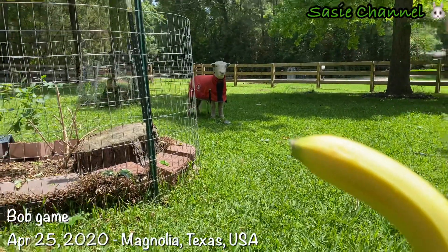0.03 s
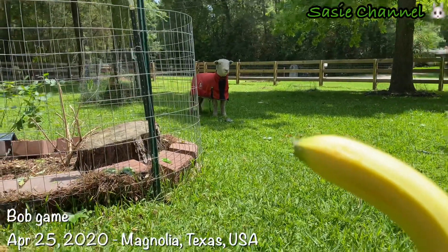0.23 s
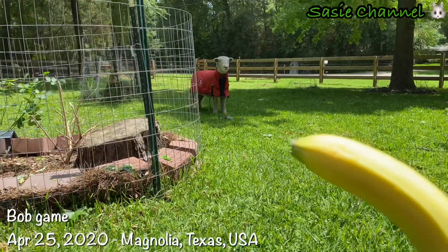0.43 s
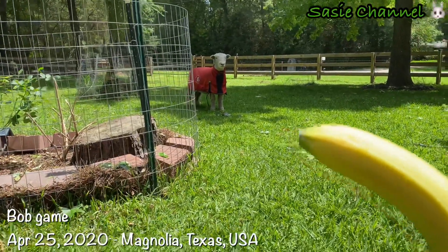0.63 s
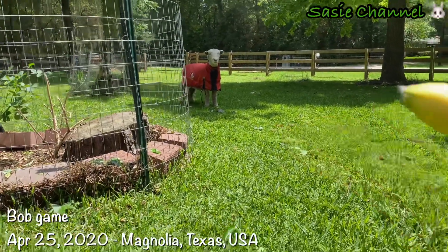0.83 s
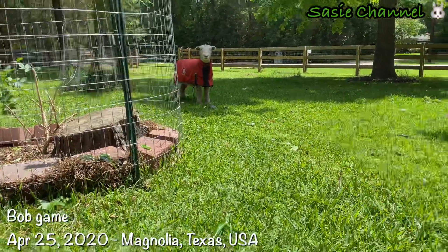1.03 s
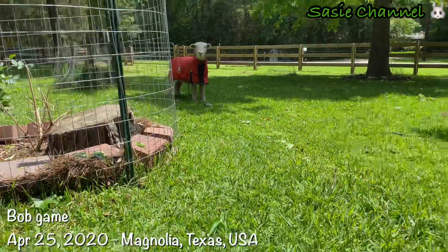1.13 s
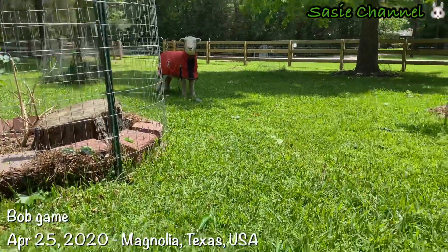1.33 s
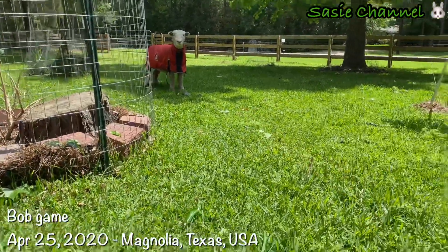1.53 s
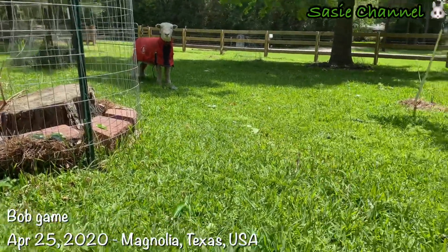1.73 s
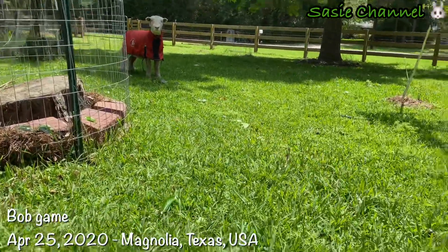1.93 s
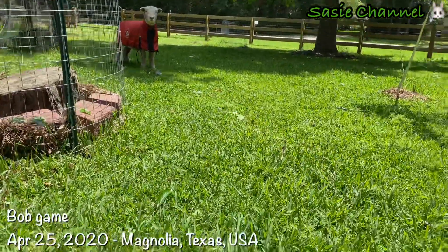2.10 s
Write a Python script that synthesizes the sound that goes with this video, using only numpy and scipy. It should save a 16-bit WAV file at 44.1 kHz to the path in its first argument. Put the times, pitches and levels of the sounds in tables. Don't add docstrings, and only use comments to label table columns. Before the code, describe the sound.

A sheep gives one low, rough, closed-mouth rumbling bleat that falls away, in a grassy yard

```python
import sys
import numpy as np
from scipy import signal
from scipy.fft import rfft, irfft, next_fast_len
from scipy.io import wavfile
from scipy.ndimage import uniform_filter1d, map_coordinates

SR = 44100
rng = np.random.default_rng(int(sys.argv[2]) if len(sys.argv) > 2 else 0)


def ratio_of_db(decibels):
    return 10 ** (np.asarray(decibels, float) / 20)


def generate_wav(signal):
    frames = np.transpose(np.atleast_2d(signal))
    scaled = np.clip(frames, -1, 1) * 32767
    pcm = np.round(scaled).astype(np.int16)
    wavfile.write(sys.argv[1], SR, pcm)


N = 95476

TOP_LEAD_S = -.000289


def unit(x):
    return x / np.sqrt(np.mean(x ** 2) + 1e-20)


def along(points, hz):
    f, v = np.transpose(points)
    return np.interp(np.log(hz + 1), np.log(f + 1), v)


def curves(rows):
    s, *cols = np.transpose(rows)
    return [np.interp(np.arange(N) / SR, s, c) for c in cols]


def wobble(rate):
    return map_coordinates(rng.standard_normal(N // 8), [np.arange(N) * rate / SR])


def filtered(x, response):
    m = next_fast_len(N + SR // 2)
    return irfft(rfft(x, m) * response(np.fft.rfftfreq(m, 1 / SR)), m)[..., :N]


def tract(peaks):
    def response(f):
        total = 0
        for k, (center, width, db) in enumerate(peaks):
            resonance = 1j * f * width / (center * center - f * f + 1j * f * width)
            total = total + (-1) ** k * ratio_of_db(db) * resonance ** 2
        return total
    return response


def pulses(rate_hz, size_db):
    phase = np.cumsum(rate_hz) / SR
    cycle = phase.astype(int)
    late = (phase - cycle) * SR / rate_hz
    puff = np.exp(-.5 * ((late - 12) / 2.5) ** 2)
    size = ratio_of_db(size_db * rng.standard_normal(N)[cycle])
    return unit(puff * size), phase


def ports(x, lead_s, pan=((100, 0),), turn=0):
    side = np.array([[.5], [-.5]])

    def response(f):
        angle = 2 * np.pi * f * lead_s + turn * f / (f + 110)
        return ratio_of_db(side * along(pan, f)) * np.exp(1j * side * angle)
    return filtered(x, response)


def rush(spectrum, patchy_db, lead_s):
    # f/Hz, shared power [0-1]
    alike = [(60, .75), (300, .55), (3000, .38), (6500, .38), (8600, .75), (11000, .45)]
    z = signal.stft(rng.standard_normal((3, N)), nperseg=512)[2]
    field = uniform_filter1d(rng.standard_normal(z.shape[1:]), 6, 0)
    field = uniform_filter1d(field, 8, 1)
    patchy = z * ratio_of_db(patchy_db * unit(field))
    common, *own = signal.istft(patchy, nperseg=512)[1][:, :N]
    share = lambda f: np.clip(along(alike, f), 0, 1)
    mix = filtered(ports(common, lead_s), lambda f: np.sqrt(share(f)))
    mix = mix + filtered(np.array(own), lambda f: np.sqrt(1 - share(f)))
    return unit(filtered(mix, lambda f: ratio_of_db(along(spectrum, f))))


def traffic():
    # f/Hz, density/dB per Hz
    spectrum = [(12, -89), (20, -47), (39, -4), (59, 7.5), (102, -0.5), (118, 1.5), (300, -24), (390, -62),
                (660, -120)]
    balance = ratio_of_db([[-1.2], [1.2]])
    return ratio_of_db(-50.5 + wobble(3)) * balance * rush(spectrum, patchy_db=.5, lead_s=0)


def leaves():
    # t/s, level/dB
    breeze = [(0.0, -50.5), (0.11, -62), (0.28, -56.5), (0.43, -64), (0.53, -58.5), (0.62, -58),
              (0.88, -59), (1.11, -61.5), (1.29, -56), (1.53, -57), (1.79, -60), (2.16, -60.5)]
    # f/Hz, density/dB per Hz
    spectrum = [(120, -60), (200, -9.5), (951, -13.5), (1170, -17.5), (1640, -15.5), (1870, -16.5),
                (4090, -23.5), (4840, -19.5), (11500, -29), (15000, -68), (22000, -120)]
    strength_db, = curves(breeze)
    return ratio_of_db(strength_db + 2) * rush(spectrum, patchy_db=3.5, lead_s=TOP_LEAD_S)


def bird():
    # t/s, length/s, start f/Hz, end f/Hz, level/dB
    notes = [
        (.16, .155, 2995, 2850, -67),
        (.945, .045, 2470, 2330, -65),
        (1.0, .035, 2400, 2800, -69),
        (2.02, .07, 2350, 2050, -66),
    ]
    t, out = np.arange(N) / SR, np.zeros(N)
    for s, length, start_hz, end_hz, db in notes:
        u = np.clip((t - s) / length, 0, 1)
        bend = 3.5 if length > .1 else 1
        hz = start_hz + (end_hz - start_hz) * u ** bend
        swell = np.sqrt(np.abs(np.sin(np.pi * u))) * (u < 1)
        out += ratio_of_db(db + 3 + 2.5 * wobble(60)) * swell * np.sin(2 * np.pi * np.cumsum(hz) / SR)
    return ports(out, TOP_LEAD_S)


def grass():
    # t/s, level/dB, length/s
    rustles = [(0.205, -60, 0.0047), (0.43, -61.5, 0.026), (0.545, -54.5, 0.057), (0.77, -56.5, 0.05),
               (1.11, -51, 0.03), (1.243, -49.5, 0.045), (1.412, -53, 0.043), (1.499, -53, 0.0047),
               (1.68, -56, 0.016), (1.757, -54, 0.027), (1.821, -52.5, 0.021), (1.875, -46, 0.024),
               (1.954, -54.5, 0.024)]
    # f/Hz, density/dB per Hz
    spectrum = [(180, -47), (300, -2.5), (673, -11), (1420, -10), (2280, -13), (3000, -12.5), (9720, -17.5),
                (11500, -10.5), (15000, -45), (22000, -120)]
    t = np.arange(N) / SR
    swell = sum(ratio_of_db(db) * np.exp(-.5 * ((t - s) / length) ** 2) for s, db, length in rustles)
    crackle = ratio_of_db(3 * wobble(250))
    return swell * unit(crackle * rush(spectrum, patchy_db=1.5, lead_s=-.00024))


def snaps():
    # t/s, peak level/dB, f/Hz
    stalks = [(.19, -39.5, 5580), (.52, -40.5, 5980), (1.1, -62, 1700), (1.481, -42, 4430),
              (1.5, -31, 5770), (1.4999, -33.5, 10200), (1.503, -36, 9650), (1.511, -40, 10500),
              (1.69, -45.5, 1050), (1.8, -37.5, 6700), (0.411, -43, 4600), (1.085, -36, 1550),
              (1.097, -36, 1700), (1.11, -35.5, 1520), (1.12, -46, 1800), (2.0, -39, 1950),
              (2.15, -36.5, 1950)]
    decay_cycles = 44
    out, t = np.zeros(N + 2000), np.arange(2000) / SR
    for s, db, hz in stalks:
        click = 0.15 * rng.standard_normal(len(t)) * ratio_of_db(-60 * t / 0.00081)
        ring = np.sin(2 * np.pi * hz * t) + click
        onset = 1 - np.exp(-t * hz)
        out[round(s * SR):][:len(t)] += ratio_of_db(db - 60 * t * hz / decay_cycles) * onset * ring
    return ports(out[:N], TOP_LEAD_S)


def tears():
    # t/s, level/dB, t60/s
    bursts = [
        (1.795, -43, 0.049),
        (1.801, -45.5, 0.093),
        (1.499, -47, .03),
        (1.4, -46, 0.035),
        (1.668, -60, 0.033),
    ]
    # f/Hz, density/dB per Hz
    spectrum = [(2500, -52), (4000, 0.5), (5500, 6.5), (7000, -5), (8500, -28), (12000, -60)]
    t = np.arange(N) / SR
    fall = sum((t > s) * ratio_of_db(db - 60 * np.abs(t - s) / t60) for s, db, t60 in bursts)
    noise = filtered(rng.standard_normal(N), lambda f: ratio_of_db(along(spectrum, f)))
    return ports(fall * unit(noise), TOP_LEAD_S)


def yard(x):
    t60_s, level_db = .25, -16
    t = np.arange(SR // 2) / SR
    tail = rng.standard_normal((2, len(t))) * ratio_of_db(-60 * t / t60_s) * (t > .012)
    tail = tail / np.linalg.norm(tail[0])
    return ratio_of_db(level_db) * signal.fftconvolve(x[None], tail, axes=1)[:, :N]


def sink():
    # t/s, f/Hz, level/dB
    slide = [(.72, 300, -52), (.78, 282, -43), (.82, 262, -46), (.87, 245, -47), (.92, 232, -42),
             (1.0, 195, -48), (1.1, 168, -45), (1.19, 142, -47), (1.27, 158, -46), (1.33, 135, -50),
             (1.42, 128, -58)]
    first_hz, (last_s, last_hz, _) = slide[0][1], slide[-1]
    hz, level_db = curves([(0, first_hz, -120), *slide, (last_s + 0.15, last_hz, -120)])
    unsteady_hz = hz * (1 + .02 * wobble(40))
    return ratio_of_db(level_db + 3 + 1.5 * wobble(30)) * np.sin(2 * np.pi * np.cumsum(unsteady_hz) / SR)


def gulps():
    # t/s, level/dB, chest f/Hz
    knocks = [(.012, -31, 186), (0.051, -27, 280), (.064, -28, 354), (.082, -31.5, 367),
              (0.106, -31.5, 172), (.136, -29, 190), (.172, -27.5, 157), (.205, -33.5, 204),
              (.238, -28, 150), (0.334, -34, 156), (0.84, -33, 121), (.882, -33.5, 125)]
    t60_s, mouth_hz = 0.063, 570
    out, t = np.zeros(N + 4000), np.arange(4000) / SR
    for s, db, hz in knocks:
        ring = np.sin(2 * np.pi * hz * t) + 0.19 * np.sin(2 * np.pi * mouth_hz * t)
        onset = 1 - np.exp(-t / 0.0039)
        out[round(s * SR):][:len(t)] += ratio_of_db(db - 60 * t / t60_s) * onset * ring * 2
    return out[:N]


def growl():
    # t/s, level/dB, mouth opening [0-1]
    shape = [(0, -29.5, 0.83), (.08, -30, 0.96), (.2, -35.5, 0.86), (.27, -39, 1), (.335, -32, 0.94),
             (.4, -45, 1), (.74, -46.5, 0.6), (.81, -37.5, 0.15), (.95, -41, 0.22), (1.3, -47.5, 0.01),
             (1.6, -48.5, 0), (2.16, -94, 0.3)]
    # f/Hz, width/Hz, level/dB
    open_mouth = [(120.6, 110, -2), (176, 20, 3.5), (264, 156, 0), (350, 79.6, 7.5), (571.6, 127, -2),
                  (1050, 440, -27), (1950, 70, -21.5)]
    # f/Hz, width/Hz, level/dB
    closed_mouth = [(89, 76, 2), (155.6, 63, 2.5), (250, 146, -9.5), (383, 110, -12.5), (528, 240, -20.5),
                    (1921, 83, -25)]
    level_db, opening = curves(shape)
    train, phase = pulses(95 * np.exp(.4 * wobble(40)), size_db=2.2)
    breath = .9 * 5 * np.cos(np.pi * phase) ** 2 * rng.standard_normal(N)
    source = train + breath
    bright = np.sqrt(opening) * unit(filtered(source, tract(open_mouth)))
    dark = np.sqrt(1 - opening) * unit(filtered(source, tract(closed_mouth)))
    return ratio_of_db(level_db) * (bright + dark)


def hum():
    # t/s, pitch/Hz, level/dB, brightness/dB
    melody = [
        (.19, 176.8, -39, -3.5),
        (.27, 182, -31, 1.5),
        (.325, 179.4, -31.5, -1),
        (.39, 183.3, -28.5, 3),
        (.44, 178.2, -32, 5),
        (.49, 168, -35, -1.5),
        (.56, 163.1, -31, -20),
        (.68, 153.7, -34, -21),
        (.79, 141.3, -38, -15),
    ]
    # f/Hz, width/Hz, level/dB
    throat = [(157, 43, -8.5), (335.7, 85, 4), (562, 68, -3.5), (754, 103, -15.5), (945, 166, -16.5),
              (1120, 122, -26), (1550, 570, -32.5)]
    chest_top_hz, breath_db, rasp_db = 415, -8, 3
    nasal_hz, nasal_width_hz, nasal_db = 1945, 100, -30.5
    pitch_hz, level_db, bright_db = curves(melody)
    train, phase = pulses(pitch_hz * (1 + .01 * wobble(60.36)), size_db=1.8)
    air = unit(np.cos(np.pi * phase) ** 2 * rng.standard_normal(N))

    chest = lambda f: tract(throat[:2])(f) / (1 + (f / chest_top_hz) ** 12)
    low = filtered(train + ratio_of_db(breath_db) * air, chest)
    third_air = ratio_of_db(-4.5 + 4.8 * wobble(25.1)) * air
    third = filtered(ratio_of_db(bright_db) * train + third_air, tract(throat[2:3]))
    high = filtered(train + ratio_of_db(rasp_db) * air, tract(throat[3:]))
    warm, = curves([(.22, .35), (.34, 1)])
    voice = (low + third + ratio_of_db(0.22 * bright_db) * warm * high) / np.std(low)

    sag = np.clip((pitch_hz.max() - pitch_hz) / 30, 0, 1)
    upper, lower = [unit(filtered(air, tract([(nasal_hz - drop_hz, nasal_width_hz, 0)]))) for drop_hz in (0, 55)]
    whine = np.sqrt(1 - sag) * upper + np.sqrt(sag) * lower
    nasal = np.sqrt(warm) * ratio_of_db(nasal_db + 3.5 * wobble(40.1)) * whine

    start_s, end_s = melody[0][0], melody[-1][0]
    on, = curves([(start_s, 0), (start_s + 0.0068, 1), (end_s - .02, 1), (end_s, 0)])
    tremor_db = .9 * wobble(24.64)
    return on * ratio_of_db(level_db + tremor_db) * (voice + nasal)


def scene():
    # t/s, length/s, depth [0-1]
    catches = [
        (.194, .007, .85),
        (.243, .005, .5),
        (.328, .012, .6),
        (.105, .005, .5),
    ]
    # f/Hz, left-right level/dB
    ram_pan = [(150, -2.5), (400, 0.5), (1300, 5), (2400, -13), (5000, -32)]
    t = np.arange(N) / SR
    shut = np.prod([1 - depth * np.exp(-.5 * ((t - s) / length) ** 2) for s, length, depth in catches], axis=0)
    ram = shut * (hum() + growl() + sink()) + gulps()
    far = traffic() + leaves() + bird()
    underfoot = grass() + snaps() + tears()
    return far + underfoot + yard(ram) + ports(ram, lead_s=.0004, pan=ram_pan, turn=1.15)


def roll_off(x):
    return signal.sosfilt(signal.butter(12, 15910, fs=SR, output="sos"), x)


def record(dry):
    # t/s, length/s, f/Hz, level/dB
    whistles = [
        (0, .042, 13447, -49),
        (.93, .085, 12462, -45),
        (1.01, .095, 14524, -51),
        (1.44, .095, 13447, -56),
    ]
    # t/s, length/s, low f/Hz, high f/Hz
    holes = [(0, .04, 11000, 16000), (0, .135, 14100, 16000), (.93, .08, 11300, 16000),
             (1.01, .07, 14800, 16000), (.36, .08, 8350, 8700), (.59, .04, 8350, 8800),
             (.67, .05, 8350, 8800), (1.1, .05, 7900, 8400), (1.24, .11, 7900, 8500),
             (1.41, .04, 7500, 8700), (1.56, .03, 7100, 7500), (1.585, .04, 7600, 8300),
             (1.69, .025, 7800, 8300), (1.77, .085, 2080, 2300), (1.93, .07, 7750, 8250),
             (1.27, .03, 2150, 2320)]
    gap_low_hz, gap_high_hz, gap_swing_hz = 11600, 12300, 300
    top_hz, shift_hz = 15150, 5500
    t = np.arange(N) / SR

    source = filtered(dry, lambda f: (f > gap_low_hz - shift_hz) & (f < top_hz - shift_hz))
    copy = filtered(2 * source * np.cos(2 * np.pi * shift_hz * t), lambda f: f > gap_low_hz)
    copy += 0.66 * ports(copy.sum(0), TOP_LEAD_S)

    gates = [np.clip(np.minimum(t - s + .004, s + length - t) / .006, 0, 1) for s, length, _, _ in whistles]
    tones = sum(g * ratio_of_db(db + 3) * np.sin(2 * np.pi * hz * t) for g, (_, _, hz, db) in zip(gates, whistles))
    duck = 1 - .85 * gates[2]
    base = filtered(dry, lambda f: f < gap_low_hz + 400)
    hz, s, z = signal.stft(base + ratio_of_db(-4) * duck * copy, SR, nperseg=1024)
    hz = hz[:, None]

    swing_hz = gap_swing_hz * np.round(np.clip(np.interp(s, t, .3 + wobble(25)), -.4, 2.2))
    low_edge = gap_low_hz - swing_hz
    swing_hz = gap_swing_hz * np.round(np.clip(np.interp(s, t, .3 + wobble(25)), -.4, 2.2))
    high_edge = gap_high_hz + swing_hz
    for start, length, lo, hi in holes:
        inside = (hz > lo) & (hz < hi) & (s >= start) & (s < start + length)
        z = z * (1 - .995 * inside)
    outside_gap = (hz < low_edge) | (hz > high_edge)
    kept = signal.istft(z * outside_gap, SR, nperseg=1024)[1][:, :N]
    return roll_off(kept + ports(tones, TOP_LEAD_S))


dry = scene()
out = record(dry)
generate_wav(out)
```